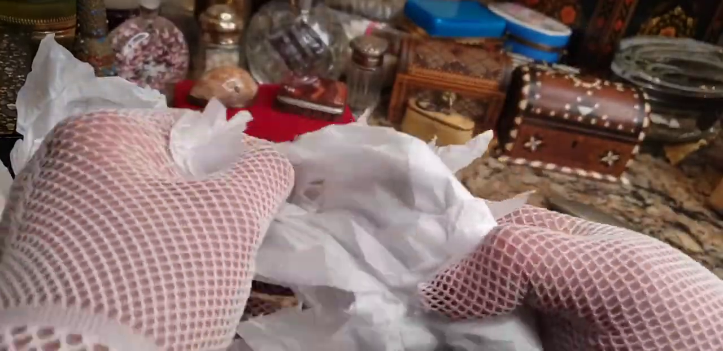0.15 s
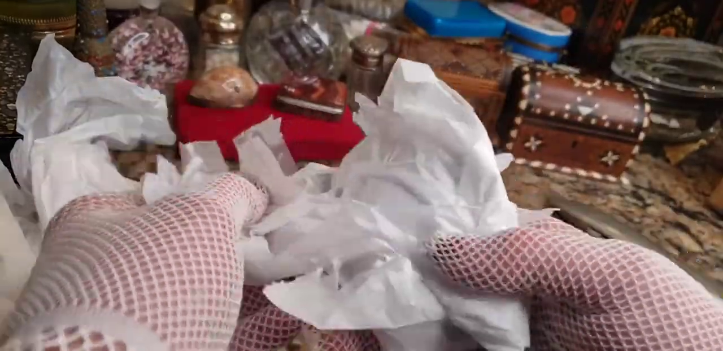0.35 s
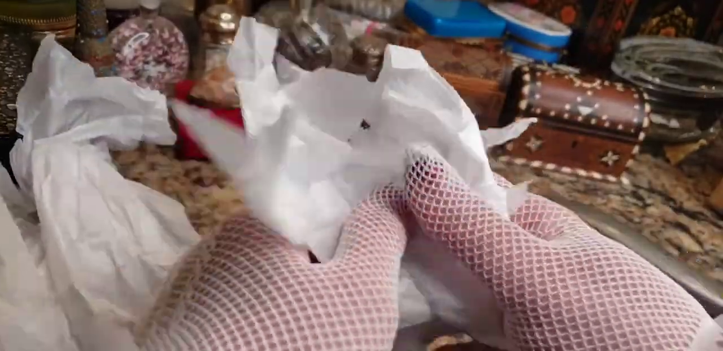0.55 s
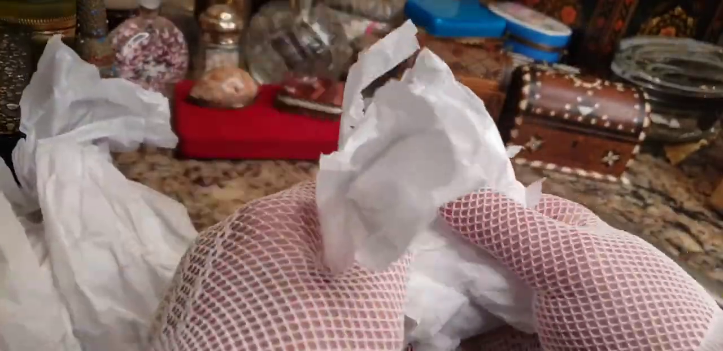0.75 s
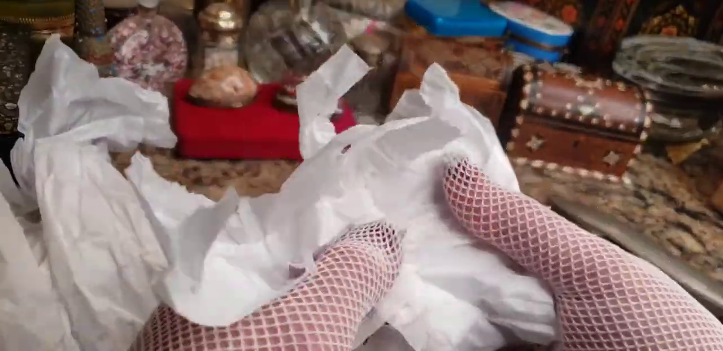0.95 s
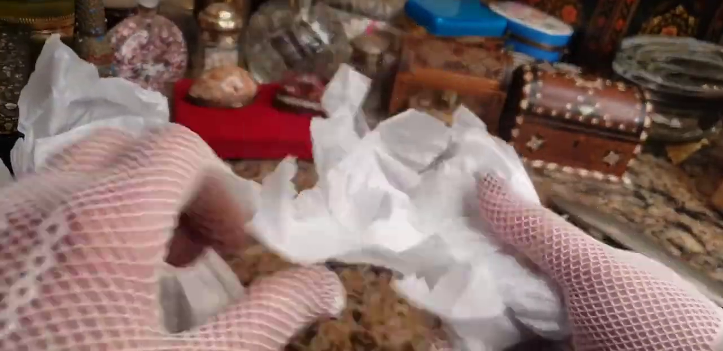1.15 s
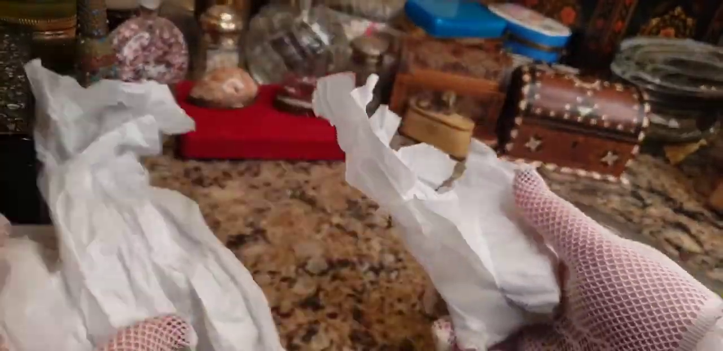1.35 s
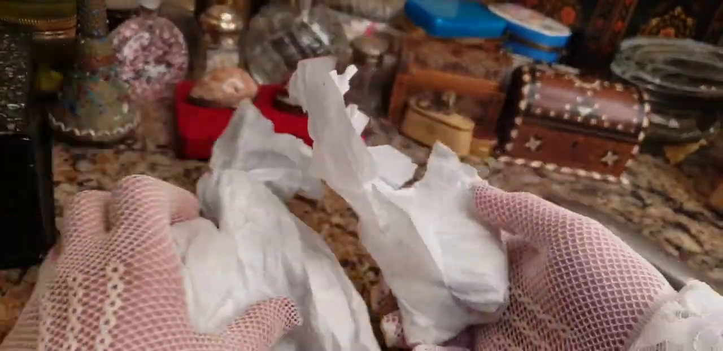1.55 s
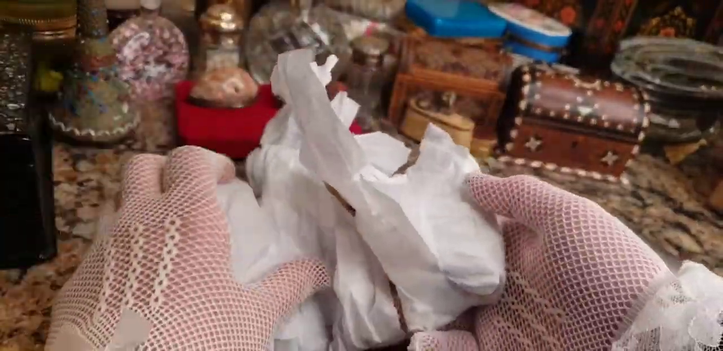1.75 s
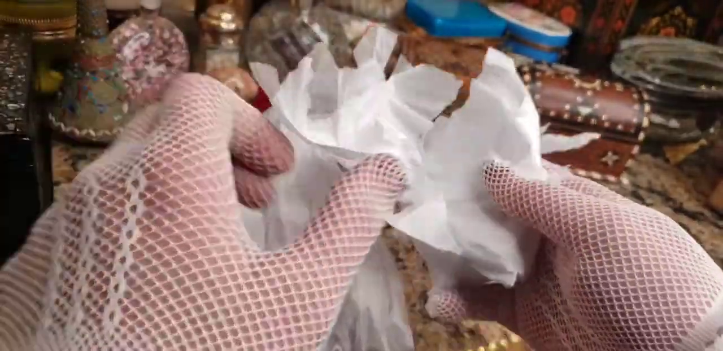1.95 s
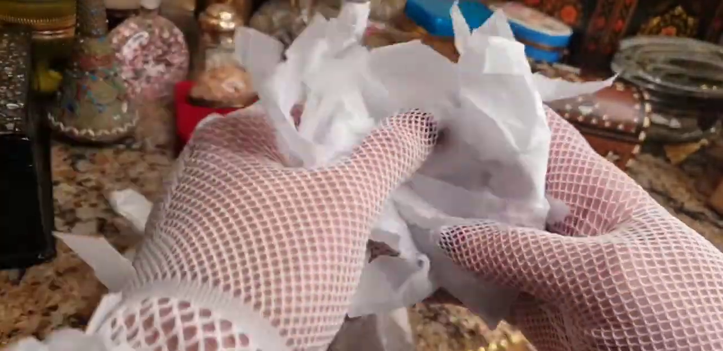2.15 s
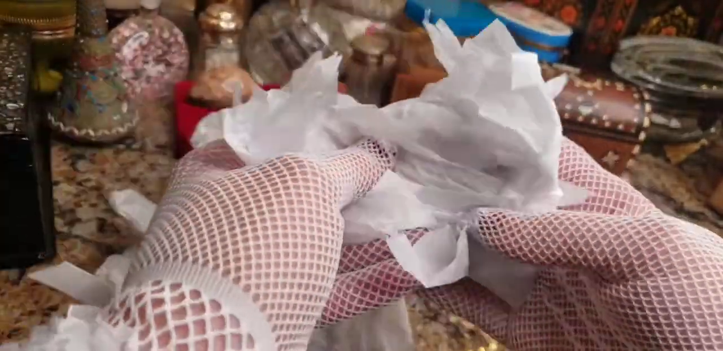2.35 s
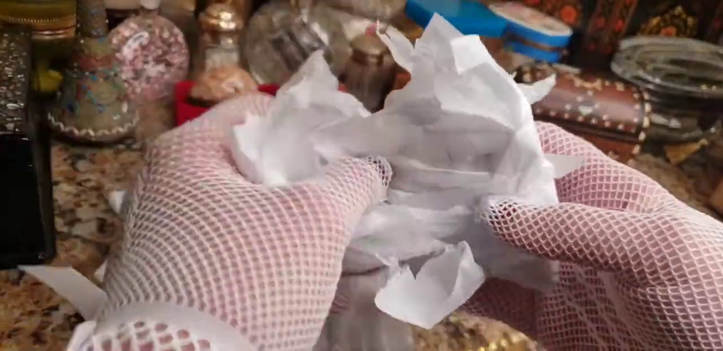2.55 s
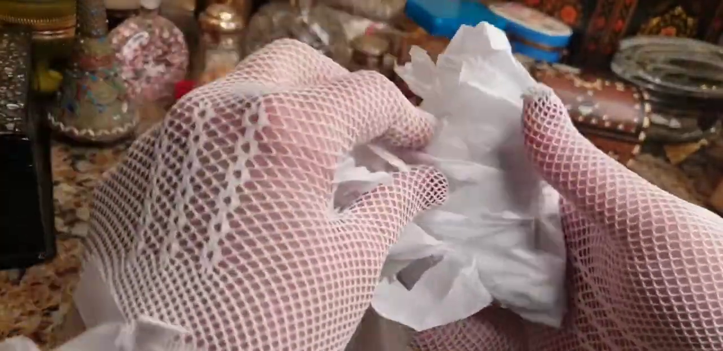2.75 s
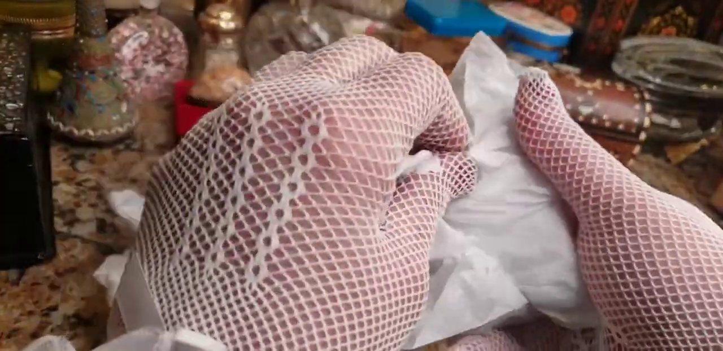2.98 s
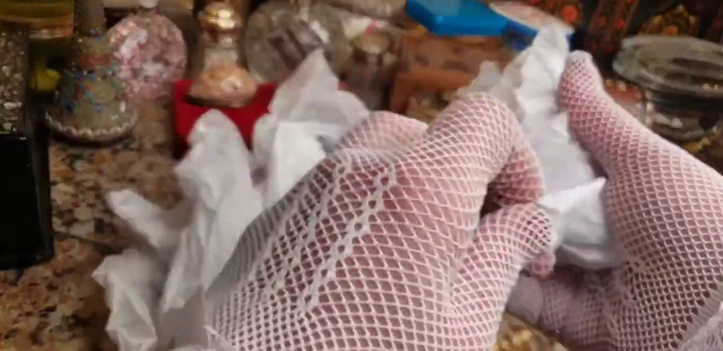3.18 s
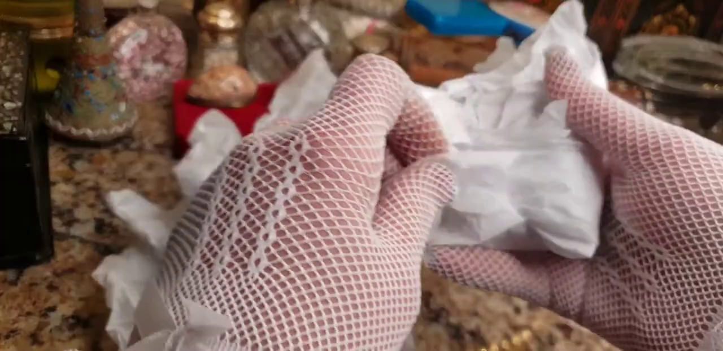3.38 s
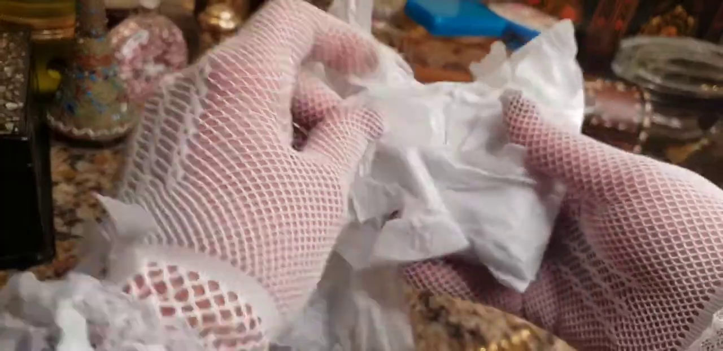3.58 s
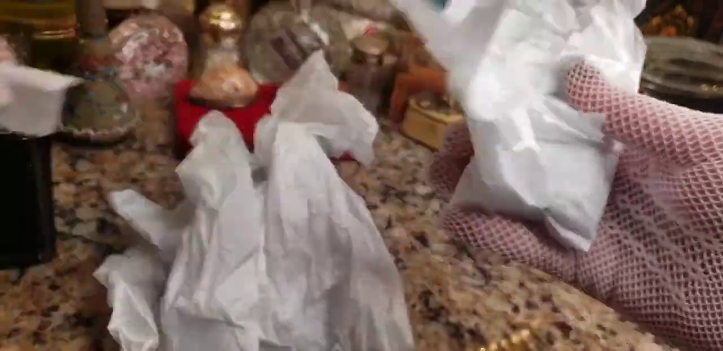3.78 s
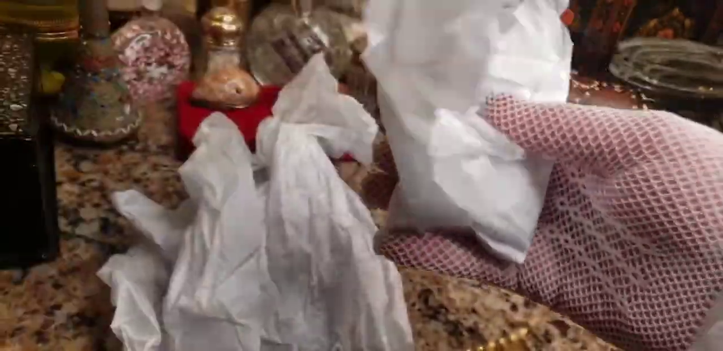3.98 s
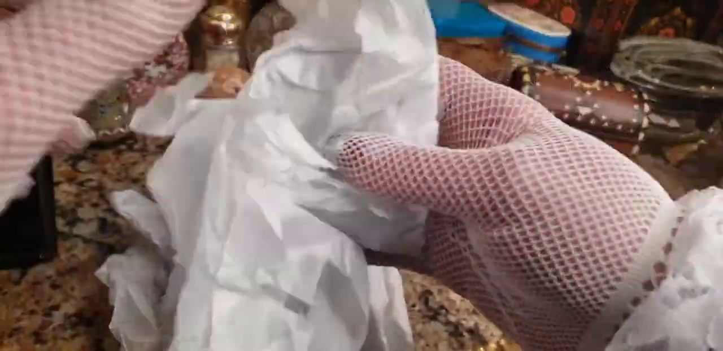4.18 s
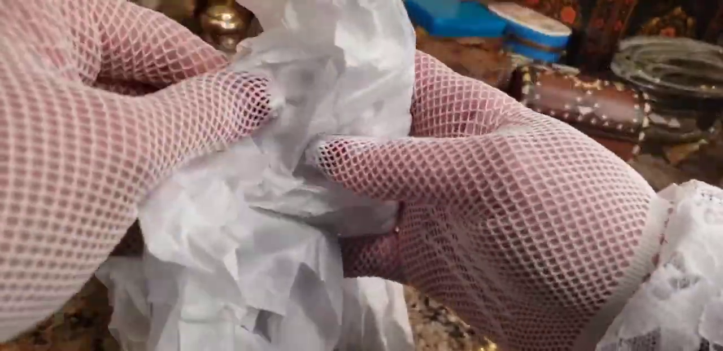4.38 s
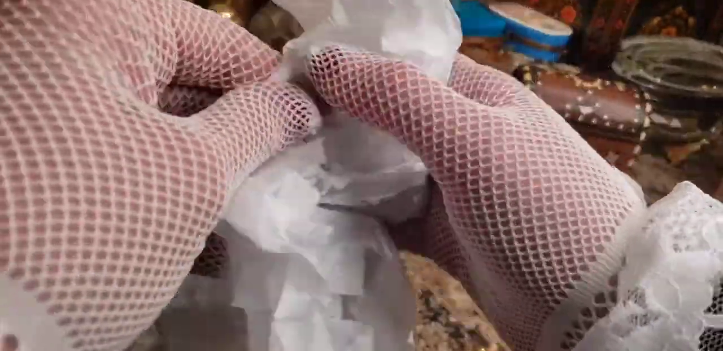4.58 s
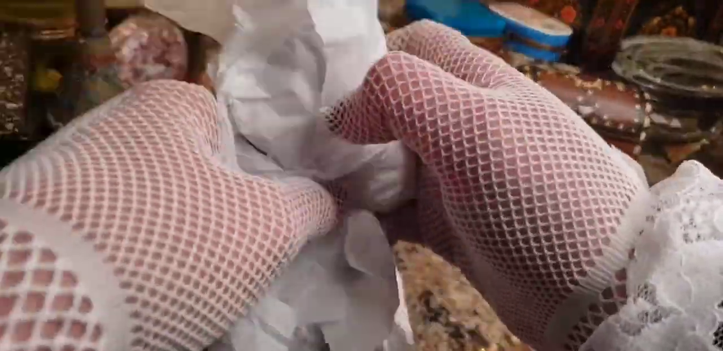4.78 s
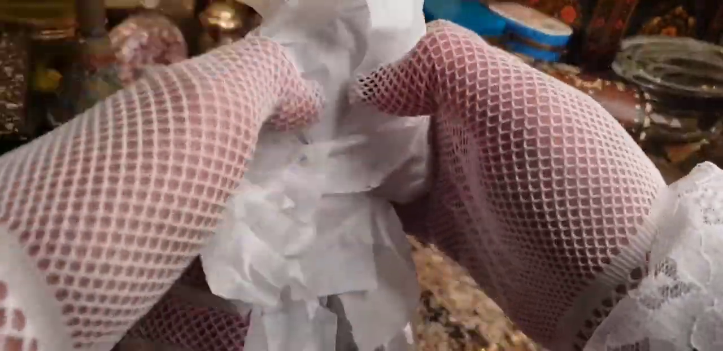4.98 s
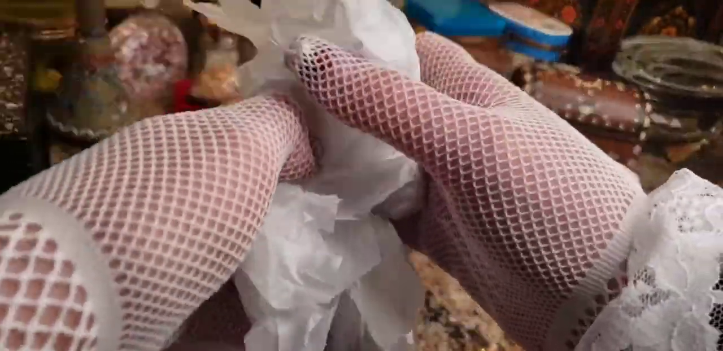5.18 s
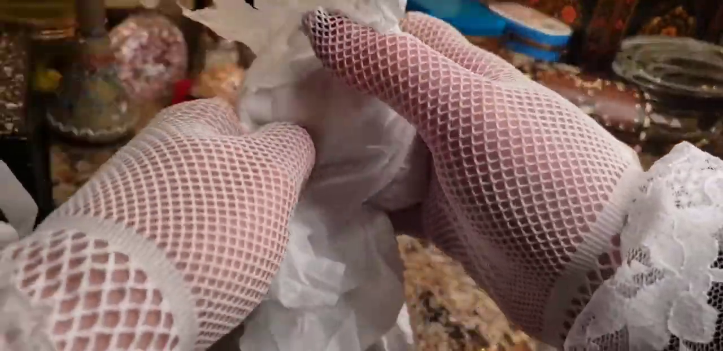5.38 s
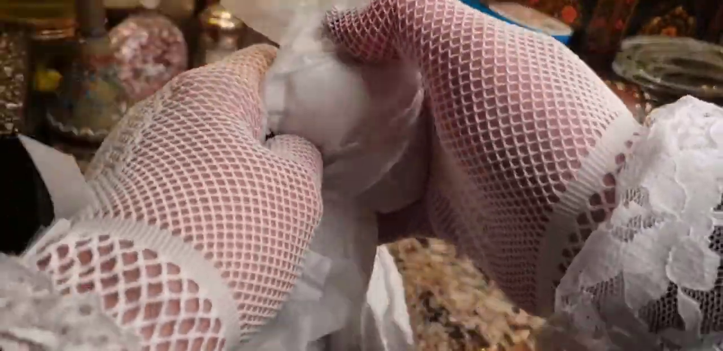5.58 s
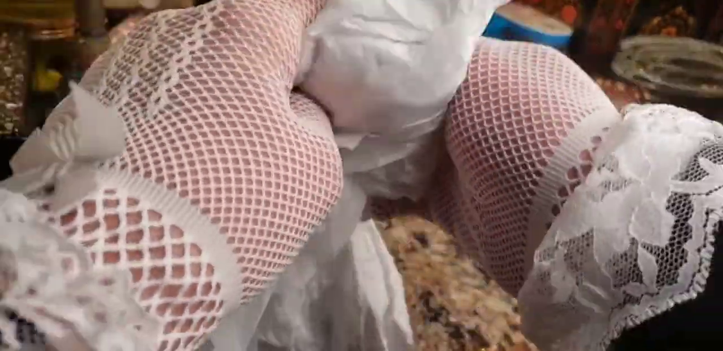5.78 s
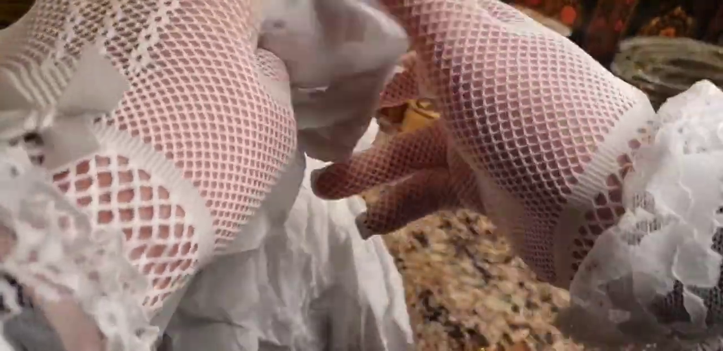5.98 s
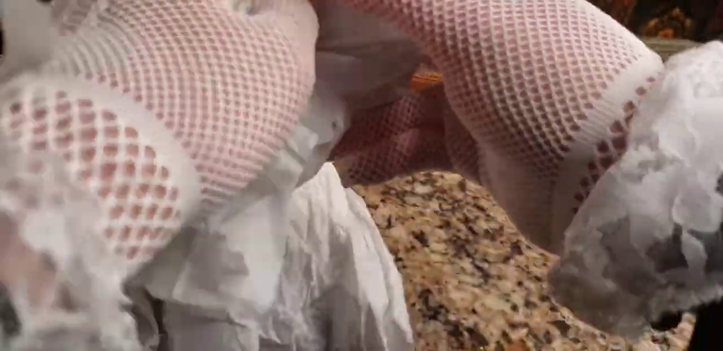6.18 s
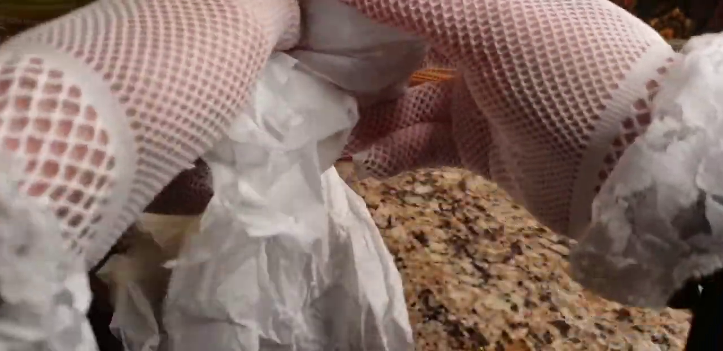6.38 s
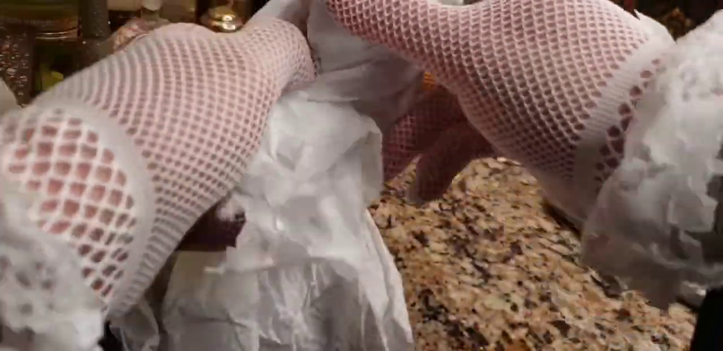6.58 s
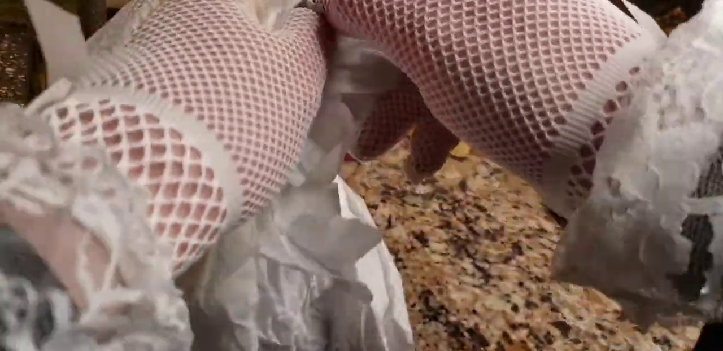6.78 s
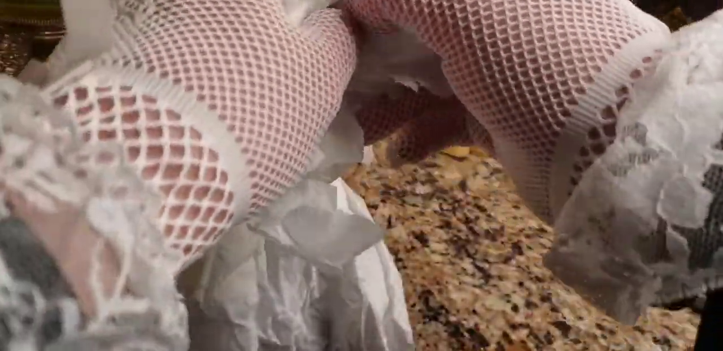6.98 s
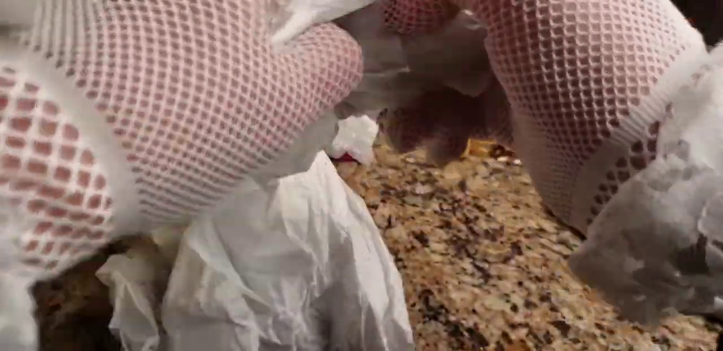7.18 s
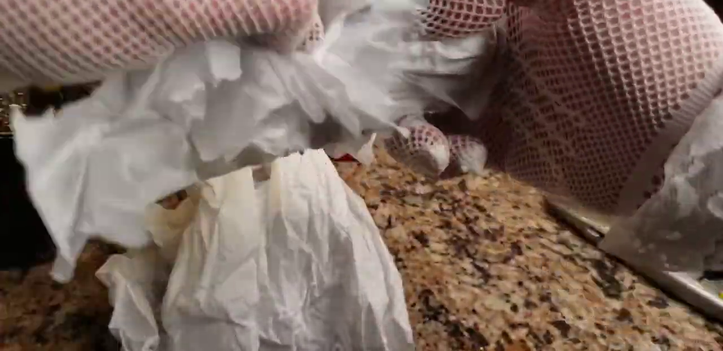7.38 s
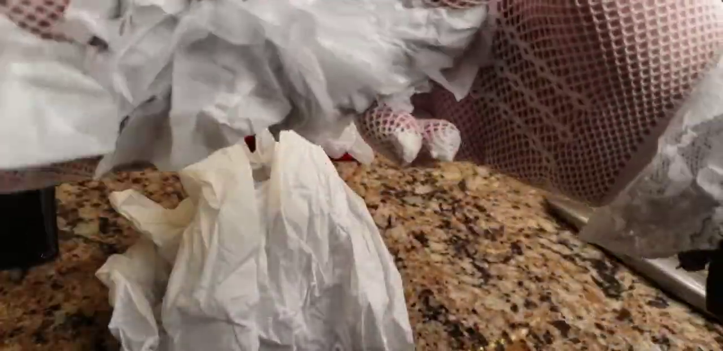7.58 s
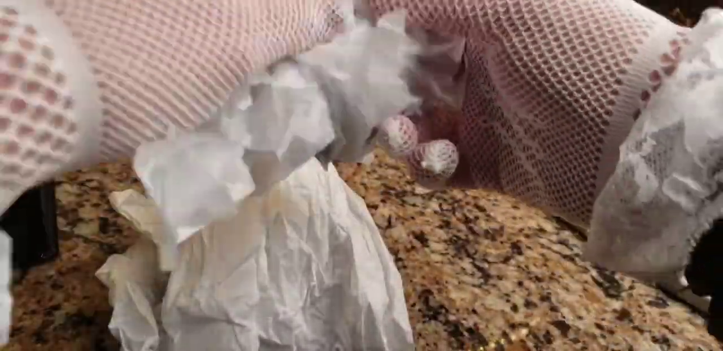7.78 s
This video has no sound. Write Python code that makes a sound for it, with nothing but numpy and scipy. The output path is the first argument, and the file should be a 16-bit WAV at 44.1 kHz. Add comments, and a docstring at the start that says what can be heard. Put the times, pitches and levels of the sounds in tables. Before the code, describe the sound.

Thin tissue paper is handled very close to a stereo microphone in a small kitchen. From 0 to 0.6 s, dense bright crackling comes in quick squeezes with a soft bump and sharp ticks; a light papery slide and several snaps follow until 1.1 s. Between 1.3 and 2 s it drops to a thin, faint rustle. Fuller crumpling returns from 2.1 s, peaking at 3.0-3.2 s with a loud crisp burst, hard snaps and a hissy slide. From 3.3 to 4.4 s it is sparse and quiet, with small ticks. Squeezes resume around 4.7 s, swelling at 5.5-5.7 s, with a clear snap at 6.0 s. Steady rustling and faint hollow sliding lead to strong crackles from 7.0 s and a rapid cluster of sharp snaps at 7.4-7.6 s, then crumpling continues to the end. Low handling rumble and barely audible hum lie underneath.

```python
"""Thin tissue paper, crumpled and pulled apart by gloved hands over a stone kitchen counter, crackles close by.
Thousands of tiny creases buckle each second as random filtered impulses; broader folds crunch below them.
Panels of the loose sheet puff, stiff ridges snap as noise bursts, and sliding paper rings hollows of the wad.
Soft bumps are low noise pulses; noise also makes the small room's echo and a wavering low handling rumble
with faint background noise, and sines make a faint mains hum."""
import sys
import numpy as np
from scipy import signal
from scipy.fft import rfft, irfft
from scipy.io import wavfile

SR = 44100
rng = np.random.default_rng(int(sys.argv[2]) if len(sys.argv) > 2 else 0)


def generate_wav(sig):
    """Save sig (samples, or channels by samples) to the path in sys.argv[1] as 16-bit PCM at SR."""
    pcm = np.round(np.clip(np.atleast_2d(sig).T, -1, 1) * 32767).astype(np.int16)
    wavfile.write(sys.argv[1], SR, pcm)


N = 346185
TIME = np.arange(N) / SR

# low handling rumble with faint background noise: (frequency [Hz], relative level [dB])
RUMBLE_SPECTRUM = [(20, -27), (40, -1), (60, 3), (120, 0.5), (250, 4.5), (600, -29.5), (2000, -3),
                   (15000, -72)]
# mains hum: (frequency [Hz], rms level ahead of the microphone [dB])
HUM_TONES = [(59, -78), (120, -74)]
# soft bumps of hand and wad: (time [s], relative peak level [dB], pitch [Hz])
SOFT_BUMPS = [(.175, -30, 450), (0.236, -41, 110), (.5, -49, 55), (1.08, -45, 70), (2.66, -48, 55),
              (3.041, -34, 380), (3.615, -38, 140), (3.651, -43, 65), (4.72, -48, 60), (4.751, -43, 140),
              (5.644, -35, 343), (5.91, -45, 80), (7.478, -32, 335)]
# paper sliding on glove or counter, ringing a hollow of the wad:
# (start [s], end [s], centre frequency [Hz], bandwidth [Hz], relative level [dB])
SLIDE_STROKES = [(0.592, 1.008, 3480, 700, -41), (1.299, 1.974, 710, 450, -59.5),
                 (1.4, 1.954, 1500, 500, -56), (2.89, 3.173, 3470, 700, -33),
                 (3.017, 3.193, 7000, 600, -32), (5.305, 5.747, 2520, 500, -51),
                 (6.65, 7.352, 1330, 298, -49), (6.754, 7.25, 2530, 280, -48),
                 (7.423, 7.62, 5100, 700, -39)]
# stiff ridges snapping through: (time [s], relative level [dB], pitch [Hz])
RIDGE_SNAPS = [(0.1817, -21, 7100), (0.3249, -26, 5260), (0.7541, -24, 6500), (0.788, -25, 5100),
               (0.8373, -22, 3500), (0.9307, -21, 5470), (1.9951, -41.5, 8300), (2.0467, -34, 6700),
               (2.1946, -26, 6500), (2.5237, -28, 8050), (2.6456, -27, 5800), (3.0249, -19, 8150),
               (3.046, -14, 7100), (3.1605, -22, 7300), (3.7734, -36, 10700), (3.9242, -37, 7800),
               (3.9735, -30, 7000), (4.0204, -28, 5670), (4.4894, -25, 10700), (4.4928, -26, 7650),
               (4.5217, -29, 9600), (4.6039, -25.5, 9000), (4.6785, -22, 6100), (5.1566, -29, 4560),
               (6.03, -20, 5060), (6.0667, -36, 7100), (6.2164, -24, 10300), (6.4034, -27.5, 5900),
               (7.0642, -21, 3600), (7.143, -19, 6060), (7.1633, -16, 5550), (7.4051, -15, 6950),
               (7.4743, -17.5, 5900), (7.5225, -14.5, 5870), (7.538, -12.5, 6140), (7.5514, -17, 5800),
               (7.5725, -16, 5770), (7.5882, -18, 5600)]
# what the paper radiates: (frequency [Hz], relative level [dB])
PAPER_SPECTRUM = [(35, -22), (80, -13), (200, -10), (400, -2), (600, -12.5), (780, -6), (1050, -2.5),
                  (1400, 1), (2000, 0), (2700, -4.5), (3300, 0.5), (4100, -0.5), (5300, 2), (16000, -3.5)]
# how the wad is held: (time [s], left minus right [dB], brightness [dB per octave])
HAND_HOLD = [(0.0, 3.5, 0), (1.1, 2, -2), (1.4, 3.8, -1), (2.4, 1, -2), (3.25, 0, -1.4), (4.0, 1.5, -1),
             (4.2, 4, -1), (4.85, 5, 1), (5.25, 3.5, -0.7), (5.66, 5.5, -0.5), (5.84, 3, -1.4),
             (6.5, 4, -0.6), (7.1, 2.5, -1), (7.52, 6, -1.5), (7.85, 3.0, -1)]
# squeezes and pulls of the hands: (peak time [s], relative crease level [dB], build-up [s], let-go [s],
# folds relative to creases [dB], sheet flap relative to creases [dB])
HAND_SQUEEZES = [(0.089, -24.5, 0.21, 0.09, -11, -23.5), (0.18, -25.5, 0.016, 0.062, -8.5, -18),
                 (0.24, -25.5, 0.021, 0.057, -12.0, -24), (0.43, -30, 0.12, 0.051, -12.0, -24.5),
                 (0.57, -29, 0.083, 0.2, -11.0, -24), (0.74, -35.0, 0.031, 0.41, -10, -29),
                 (0.969, -35, 0.13, 0.017, -11, -21), (1.07, -28.5, 0.033, 0.077, -12, -21),
                 (1.359, -35.0, 0.032, 0.21, -10.5, -17.5), (1.69, -41, 0.52, 0.025, -11, -17.5),
                 (1.77, -40.0, 0.073, 0.17, -7.5, -17), (2.219, -28.5, 0.11, 0.055, -11.5, -21.5),
                 (2.37, -30.5, 0.19, 0.063, -9.5, -26.5), (2.56, -31.5, 0.11, 0.047, -11, -23.5),
                 (2.83, -30, 0.24, 0.12, -11.5, -24), (2.95, -28.5, 0.066, 0.28, -9.5, -24.5),
                 (3.07, -21, 0.03, 0.11, -10.5, -25.5), (3.17, -25, 0.04, 0.03, -11, -23),
                 (3.31, -34.5, 0.032, 0.36, -10, -19.5), (3.66, -33.5, 0.257, 0.022, -14, -19),
                 (3.78, -40.5, 0.051, 0.15, -12.5, -34), (4.019, -39.5, 0.061, 0.019, -10, -27),
                 (4.19, -40.5, 0.087, 0.052, -11.5, -31), (4.31, -36.5, 0.097, 1.1, -13, -22),
                 (4.69, -29.5, 0.1, 0.043, -14.5, -27), (4.78, -28, 0.049, 0.038, -12.5, -25),
                 (4.92, -36.0, 0.19, 0.056, -12.5, -26), (5.26, -32.5, 0.18, 0.021, -12, -20.5),
                 (5.541, -27.5, 0.27, 0.19, -11.0, -26), (5.66, -23.5, 0.041, 0.055, -11.0, -21),
                 (5.85, -37.0, 0.109, 0.022, -11, -31), (6.04, -26.5, 0.017, 0.015, -10.5, -28),
                 (6.22, -32.0, 0.29, 0.059, -10.5, -22.5), (6.48, -34.5, 0.2, 0.13, -11, -23),
                 (6.63, -29.5, 0.089, 0.082, -12, -24.5), (6.87, -32, 0.2, 0.039, -10.5, -23.5),
                 (7.069, -28.5, 0.18, 0.132, -12.5, -26), (7.17, -25.5, 0.038, 0.15, -11.0, -36),
                 (7.43, -25.5, 0.16, 0.097, -15.5, -26), (7.56, -28.5, 0.097, 0.046, -14.5, -27),
                 (7.75, -28, 0.22, 0.041, -12.5, -22), (7.84, -30, 0.052, 0.071, -14, -21)]
# stirring in hands that only hold the wad: (crease, fold, sheet relative levels [dB])
REST_LEVELS = (-53.5, -65, -71.5)
# response of the two microphone ports: (frequency [Hz], left level [dB], right level [dB])
PORT_RESPONSE = [(2440, 1, 0.5), (3110, -1.5, -2.5), (5300, 2.5, 2), (6000, 1, 1.5), (6860, -2.5, 11.5),
                 (7590, -5.5, 8), (8350, -8, 1), (10140, -10.5, 12.5), (11960, -14, 13.5),
                 (12700, -15, 8.5), (13700, -14, 10), (15300, -29, 5.5)]

SQUEEZE_SHAPE = 1.64  # how the pressure swells and eases: 1 is a cusp, 2 a rounded bell
CREASE_DB, FOLD_DB, FLAP_DB = -1.0, -0.74, -1.6  # gain of each kind of buckling
FOLD_TILT_DB = 0.58  # per octave
TOP_HZ = 15800  # upper limit of the microphone


def undb(db):
    """Logarithmic measure: decibels become an amplitude ratio."""
    return 10 ** (np.asarray(db) / 20)


def unit(x):
    """Normalisation: scale to an rms of one."""
    return x / np.sqrt(np.mean(x ** 2))


def curves(table):
    """Linear interpolation: each column of a timed table, sample by sample."""
    s, *columns = np.transpose(table)
    return [np.interp(TIME, s, c) for c in columns]


def convolve(x, response):
    """Linear superposition: pass a stereo sound through an impulse response."""
    return signal.fftconvolve(x, np.atleast_2d(response), axes=1)[:, :N]


def colour(points, size=4096):
    """Minimum phase: the causal impulse response of a spectrum, found by folding its cepstrum."""
    hz, db = np.transpose(points)
    bins = np.maximum(np.fft.rfftfreq(size, 1 / SR), 1)
    level_db = np.interp(np.log(bins), np.log(hz), db)
    cepstrum = irfft(np.log(undb(level_db)))
    cepstrum[1:size // 2] *= 2
    cepstrum[size // 2 + 1:] = 0
    return irfft(np.exp(rfft(cepstrum)))


def band(x, lo, hi, order=3):
    """Frequency selection: a Butterworth band-pass."""
    edges = np.clip([lo, hi], [10, 20], [.47 * SR, .48 * SR])
    sos = signal.butter(order, np.sort(edges), "band", fs=SR, output="sos")
    return signal.sosfilt(sos, x)


def add(out, s, sound):
    """Superposition: mix a short sound in at a time."""
    i = max(int(s * SR), 0)
    out[:, i:i + sound.shape[-1]] += sound[..., :N - i]


def walk(per_s):
    """Random fluctuation: straight lines between chance values drawn at a steady rate."""
    steps = rng.standard_normal(2048)
    return np.interp(TIME * per_s, np.arange(len(steps)), steps)


def scatter(x, decay_s):
    """Multiple scattering: pops bounce about the wad, so noise follows their smoothed power."""
    keep = np.exp(-1 / (decay_s * SR))
    power = signal.lfilter([1 - keep], [1, -keep], x ** 2)
    return np.sqrt(power) * rng.standard_normal(x.shape)


def buckles(edges, per_s, spread_db, pitch_db, facing_db, clump_db, clumps_per_s, tail_db, tail_s,
            busy=1, lag_s=-0.000041, width_s=.00009):
    """Elastic instability: random pops of buckling paper, one stereo track per band between the edges [Hz]."""
    count = int(per_s * N / SR)
    at = rng.integers(0, N, count)
    luck = rng.random(count)
    chance = np.clip(rng.standard_normal((9, count)), -2.3, 2.3)
    # slow hands set off fewer pops, each standing out more
    share = np.clip(busy * np.ones(N), .01, 1)[at]
    fired = np.sign(chance[3]) * (luck < share) / np.sqrt(share)
    # one crease giving way loads its neighbours, so pops come in little avalanches
    avalanche = np.clip(walk(clumps_per_s), -2, 2)[at]
    size_db = spread_db * chance[0] + clump_db * avalanche
    # each facet sits elsewhere in the wad and faces one port more than the other
    lag = np.round(SR * (lag_s + width_s * chance[1])).astype(int)
    left_at = np.clip(at + lag, 0, N - 1)
    facing = undb(facing_db * chance[2])
    tracks = []
    for lo, hi, own in zip(edges, edges[1:], chance[4:]):
        push = fired * undb(size_db + pitch_db * own)
        left = np.bincount(left_at, push * facing, N)
        right = np.bincount(at, push / facing, N)
        pops = np.array([left, right])
        pops = unit(pops + undb(tail_db) * scatter(pops, tail_s))
        tracks.append(band(pops, lo / 1.08, hi * 1.07))
    return tracks


def background(rumble_db=-66, side_db=-9, waver_db=2.0):
    """Interchannel coherence: a wavering low handling rumble with faint noise, nearly alike at both ports, and hum."""
    mid, side = rng.standard_normal((2, N))
    noise = mid + undb(side_db) * np.array([side, -side])
    rumble = convolve(noise * undb(waver_db * walk(9)), colour(RUMBLE_SPECTRUM))
    hum = sum(undb(db) * np.sqrt(2) * np.sin(2 * np.pi * hz * TIME) for hz, db in HUM_TONES)
    return undb(rumble_db) * unit(rumble) + hum


def kitchen(x, room_db=-14, t60_s=0.27, damp_hz=6000):
    """Reverberation: walls add a short, duller tail whose long waves reach both ports alike."""
    t = TIME[:SR // 2]
    shared, *own = rng.standard_normal((3, len(t)))
    tail = band(shared, 244, 1580, order=2) + band(np.array(own), 1270, damp_hz, order=1)
    tail = tail * undb(-60 * t / t60_s) * (t > .004)  # the first echo comes after 4 ms
    response = undb(room_db) * unit(tail) / np.sqrt(len(t))
    return x + convolve(x, response)


def bumps(swell_s=0.0073):
    """Soft impact: contacts push a brief swell of low-pitched noise."""
    out, t = np.zeros((2, N)), TIME[:SR // 8]
    for s, db, hz in SOFT_BUMPS:
        noise = band(rng.standard_normal(len(t)), hz / 1.2, hz * 1.3, order=2)
        thud = noise * t * np.exp(-t / swell_s)
        add(out, s, undb(db) * thud / np.abs(thud).max())
    return out


def sheet():
    """Panel buckling: whole panels of the sheet flip over with dull puffs."""
    tracks = buckles([35, 260, 650], per_s=1100, spread_db=4.0, pitch_db=2.0, facing_db=2.5,
                     clump_db=3.0, clumps_per_s=36, tail_db=-14.0, tail_s=0.0043)
    return unit(convolve(sum(tracks), colour(PAPER_SPECTRUM)))


def slides():
    """Stick-slip friction: fine grit excites a hollow's resonance while the stroke lasts."""
    out = np.zeros((2, N))
    grit, = buckles([300, 12000], per_s=5000, spread_db=1.0, pitch_db=-1.0, facing_db=2.0,
                    clump_db=7.0, clumps_per_s=90, tail_db=-20, tail_s=.002)
    for start, end, hz, width, db in SLIDE_STROKES:
        stroke = grit[:, int(start * SR):int(end * SR)]
        ring = unit(band(stroke, hz - width / 2, hz + width / 2, order=2))
        add(out, start, undb(db) * ring * signal.windows.tukey(ring.shape[1], .5))
    return out


def snaps(run_s=0.00081, ring_db=3, left_db=0, top_hz=11500, size=512):
    """Snap-through: a ridge runs through in about a millisecond and rings briefly at its own pitch."""
    out, t = np.zeros((2, N)), np.arange(size) / SR
    for s, db, hz in RIDGE_SNAPS:
        burst = rng.choice([-1, 1], (2, size)) * np.exp(-t / run_s)
        ring = band(burst, hz / 1.52, hz * 1.3, order=2)
        crack = band(burst, 1230, top_hz, order=2) + undb(ring_db) * ring
        first_ms = np.sqrt(np.mean(crack[:, :SR // 1000] ** 2, axis=1, keepdims=True))
        add(out, s, undb(db) * crack / first_ms)
    return out * undb([[left_db], [0]])


def folds(busy, tilt_db, drift_db=0.63):
    """Scale of buckling: broader folds give way less often and crunch lower."""
    edges = np.array([650, 1100, 1900, 3000])
    tracks = buckles(edges, per_s=6000, spread_db=4.0, pitch_db=2.5, facing_db=2.5,
                     clump_db=2.0, clumps_per_s=110, tail_db=-10.0, tail_s=0.01,
                     busy=busy, lag_s=-0.000081, width_s=.00007)
    octaves = np.log2(edges[:-1] / edges[1])
    crunch = sum(x * undb(tilt_db * o + drift_db * walk(9)) for x, o in zip(tracks, octaves))
    return unit(convolve(crunch, colour(PAPER_SPECTRUM)))


def squeezing():
    """Addition of powers: overlapping squeezes, each building and letting go, drive creases, folds and sheet."""
    power = undb(REST_LEVELS)[:, None] ** 2 * np.ones(N)
    for s, db, build_s, ease_s, fold_db, flap_db in HAND_SQUEEZES:
        near = slice(max(int((s - 3 * build_s) * SR), 0), int((s + 3 * ease_s) * SR))
        since = TIME[near] - s
        distance = np.maximum(-since / build_s, since / ease_s)
        pressure = np.exp(-distance ** SQUEEZE_SHAPE)
        power[:, near] += np.outer(undb([db, db + fold_db, db + flap_db]), pressure) ** 2
    return np.sqrt(power)


def creases(busy, bright_db, drift_db=0.8):
    """Pulse density: tiny creases fuse into sizzle, longer ones tick apart; colour shifts as facets turn."""
    edges = np.array([3000, 4400, 6200, 8600, 12500, 17000])
    tiny = buckles(edges, per_s=14000, spread_db=4.5, pitch_db=3.0, facing_db=2.4,
                   clump_db=1.5, clumps_per_s=170, tail_db=-3, tail_s=.002, busy=busy)
    longer = buckles(edges, per_s=420, spread_db=2.2, pitch_db=2.6, facing_db=1.8,
                     clump_db=1.2, clumps_per_s=50, tail_db=8, tail_s=.0006)
    tick = undb(-6 - 3 * np.minimum(busy, 1))  # ticks stand out more when the hands are slow
    octaves = np.log2(edges[:-1] / edges[2])
    sizzle = 0
    for fine, coarse, o in zip(tiny, longer, octaves):
        sizzle = sizzle + (fine + tick * coarse) * undb(bright_db * o + drift_db * walk(11))
    return unit(convolve(sizzle, colour(PAPER_SPECTRUM)))


def scene(full_db=-24, crowding=.7):
    """Common excitation: creases, folds and sheet follow the squeezes, and all paper sounds share the room."""
    crease, fold, flap = squeezing()
    pan_db, bright_db = curves(HAND_HOLD)
    busy = (crease / undb(full_db)) ** crowding  # a harder squeeze buckles more creases at once
    crackle = creases(busy, bright_db) * crease * undb(CREASE_DB)
    crunch = folds(busy, FOLD_TILT_DB) * fold * undb(FOLD_DB)
    pan = undb(np.array([pan_db, -pan_db]) / 2)
    paper = (crackle + crunch + slides()) * pan + undb(-2.5) * snaps()
    flapping = sheet() * flap * undb(FLAP_DB)
    return kitchen(paper + flapping + undb(-8.0) * bumps()) + background()


def record(dry, ceiling=0.84):
    """Transduction: a dull left port, a right one ringing in the treble, rounded peaks and a cut top."""
    hz, *sides = np.transpose(PORT_RESPONSE)
    heard = convolve(dry, [colour(np.column_stack([hz, db])) for db in sides])
    rounded = heard / (1 + (heard / ceiling) ** 4) ** .25
    low_pass = signal.ellip(12, .1, 80, TOP_HZ, fs=SR, output="sos")
    return signal.sosfilt(low_pass, rounded)


dry = scene()
out = record(dry)
generate_wav(out)
```